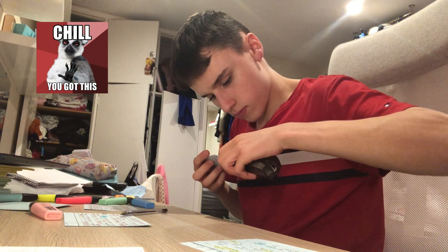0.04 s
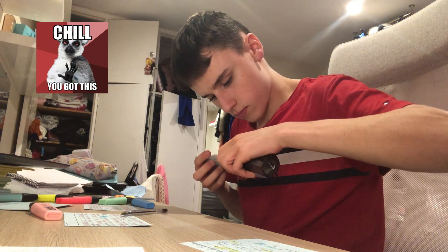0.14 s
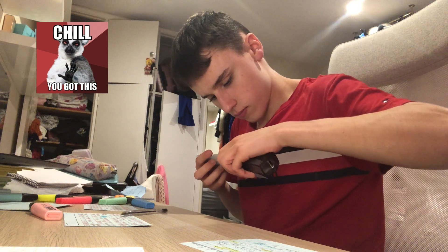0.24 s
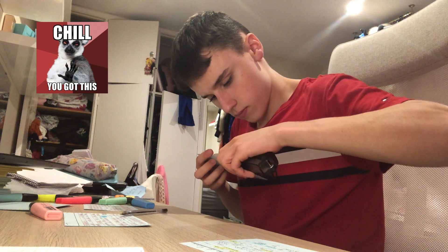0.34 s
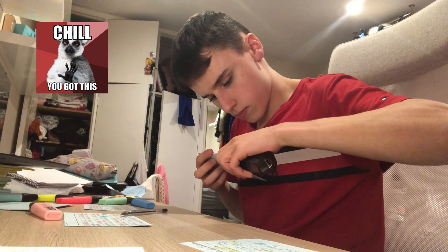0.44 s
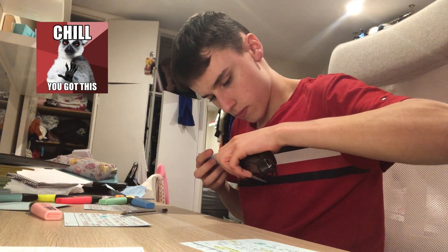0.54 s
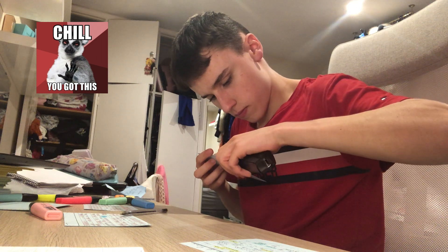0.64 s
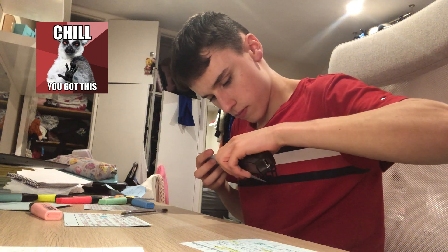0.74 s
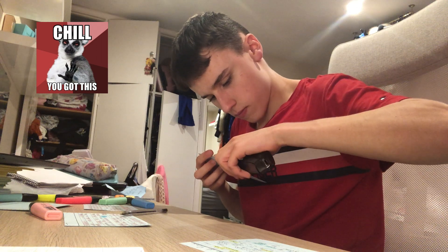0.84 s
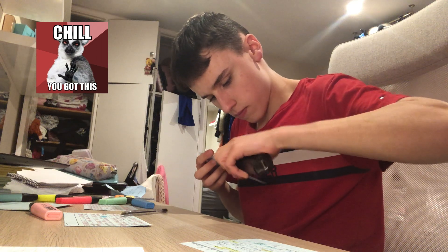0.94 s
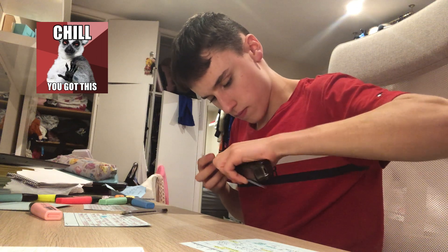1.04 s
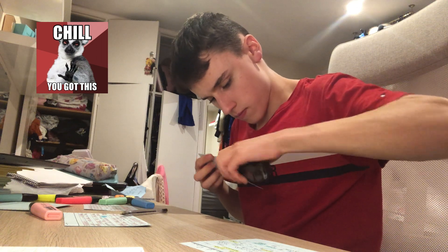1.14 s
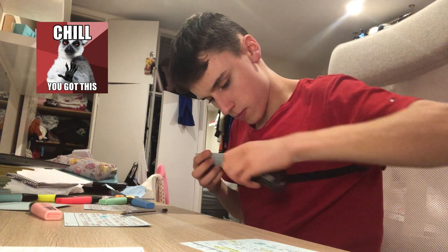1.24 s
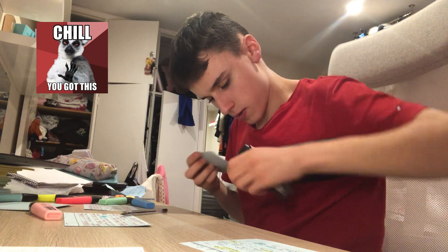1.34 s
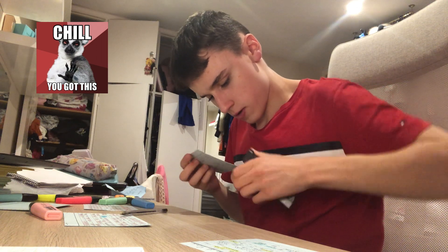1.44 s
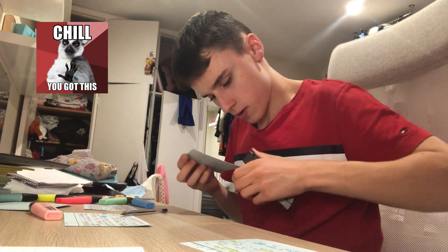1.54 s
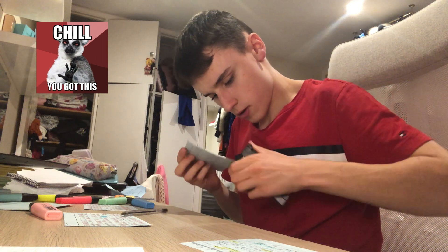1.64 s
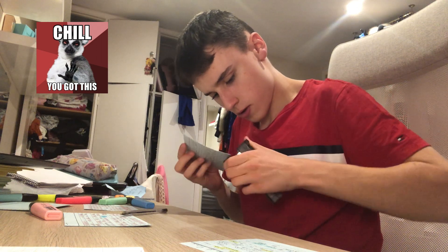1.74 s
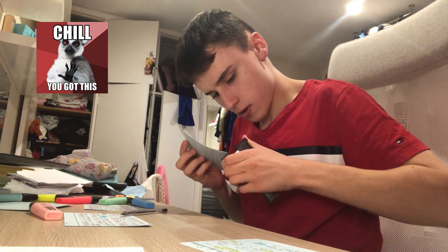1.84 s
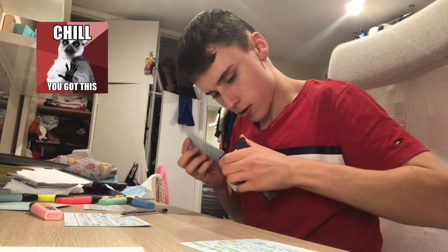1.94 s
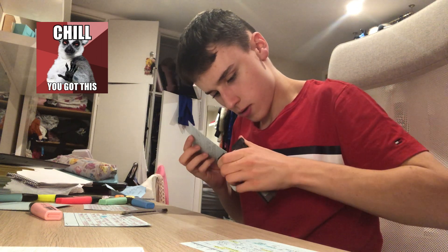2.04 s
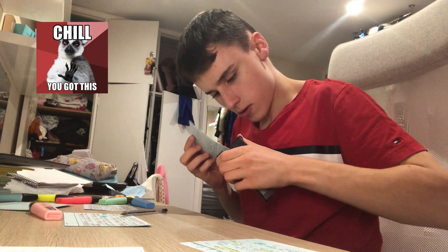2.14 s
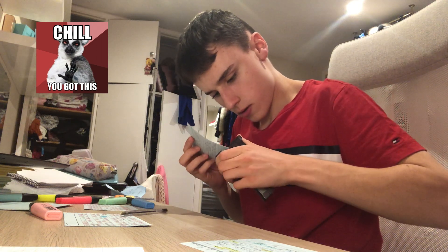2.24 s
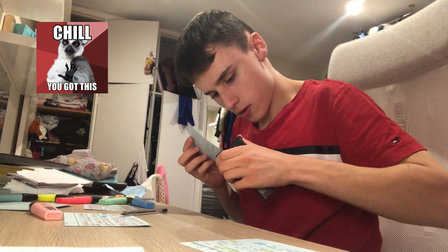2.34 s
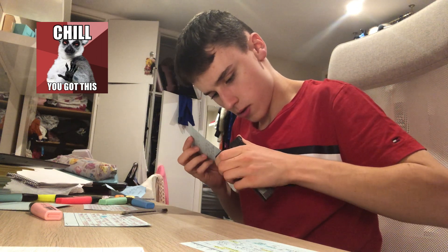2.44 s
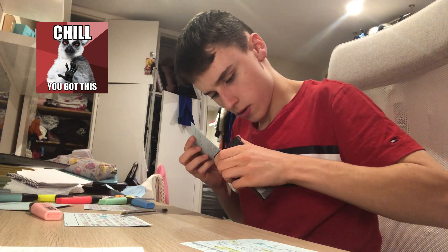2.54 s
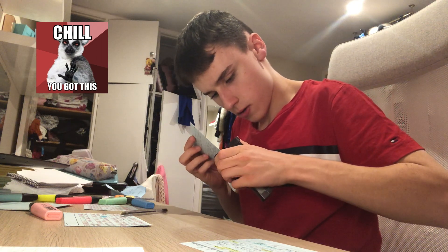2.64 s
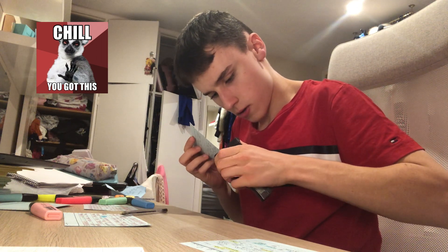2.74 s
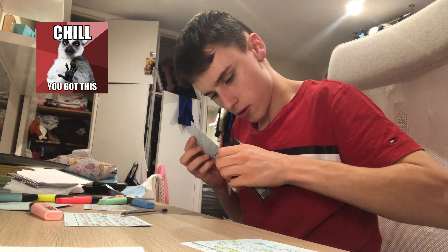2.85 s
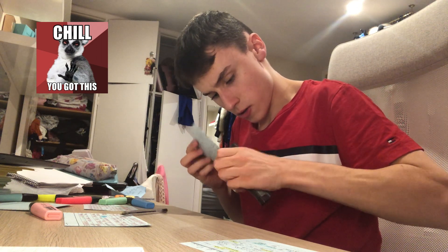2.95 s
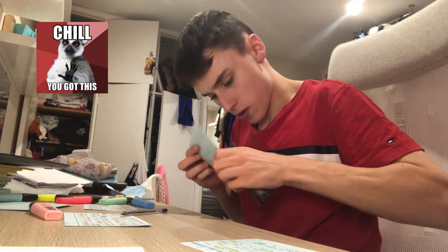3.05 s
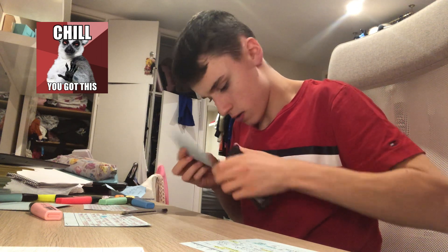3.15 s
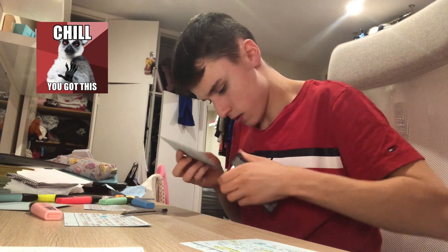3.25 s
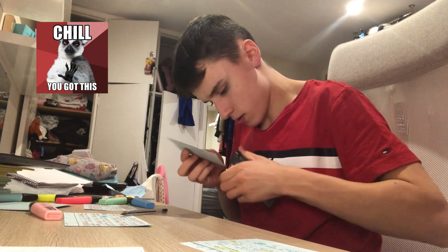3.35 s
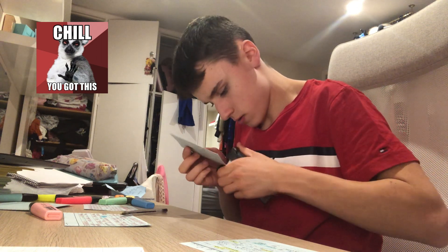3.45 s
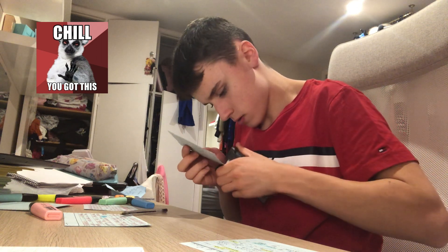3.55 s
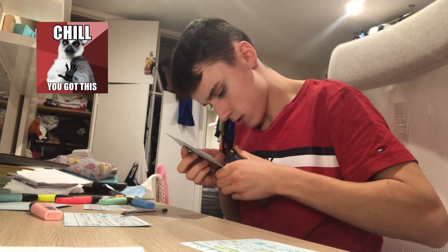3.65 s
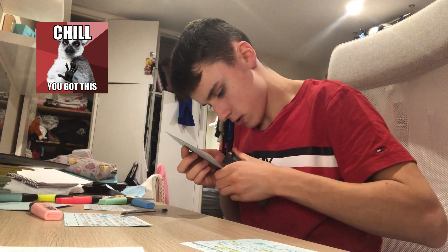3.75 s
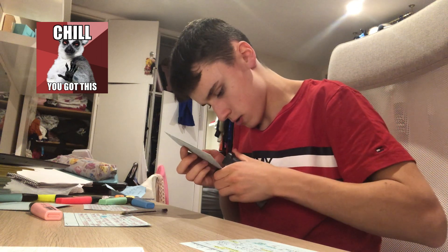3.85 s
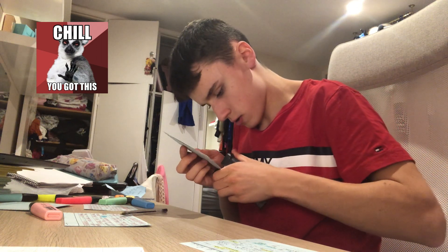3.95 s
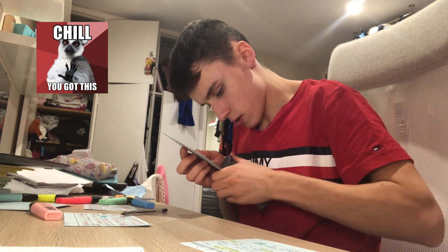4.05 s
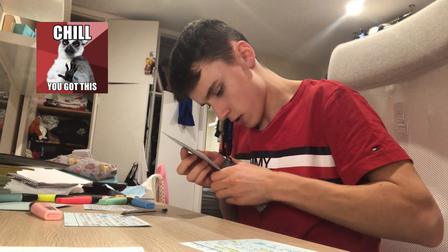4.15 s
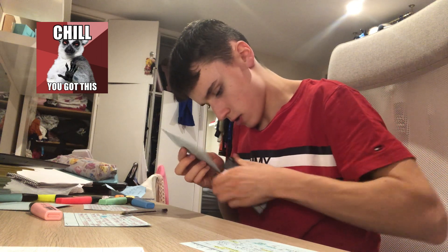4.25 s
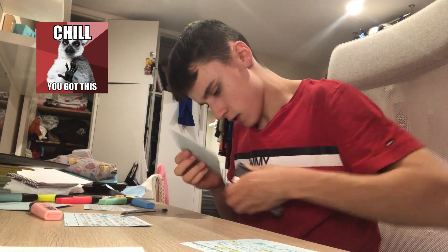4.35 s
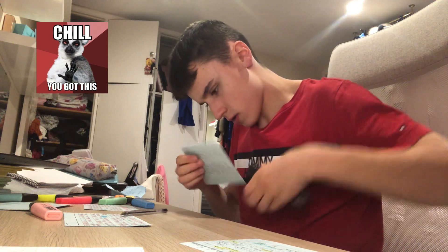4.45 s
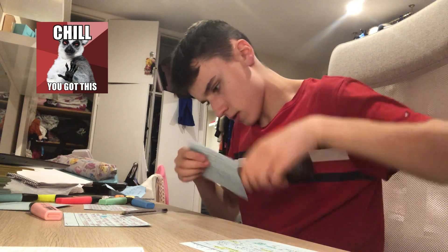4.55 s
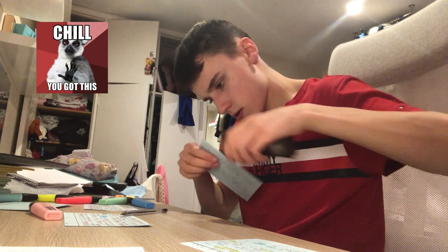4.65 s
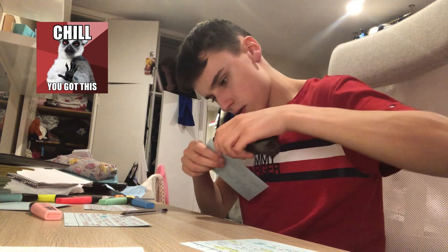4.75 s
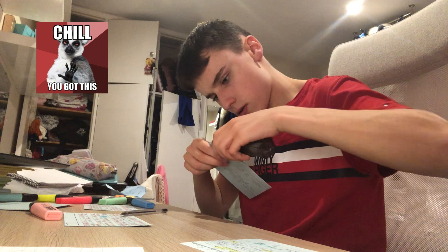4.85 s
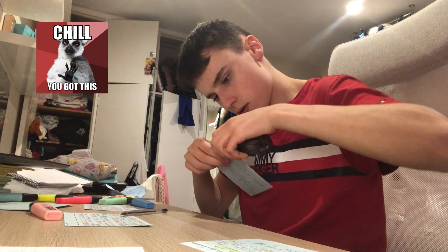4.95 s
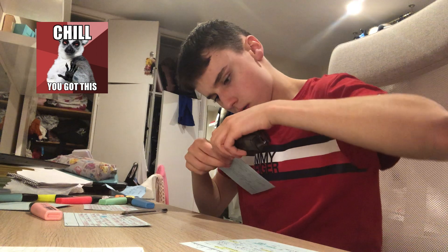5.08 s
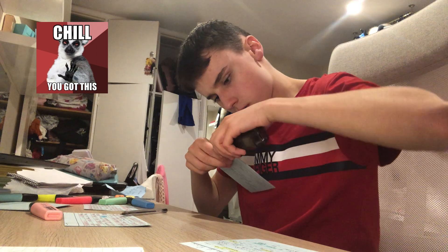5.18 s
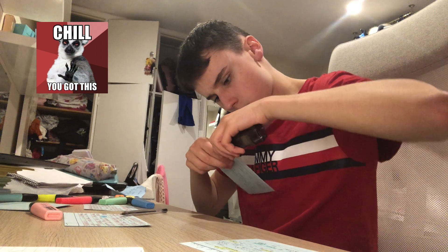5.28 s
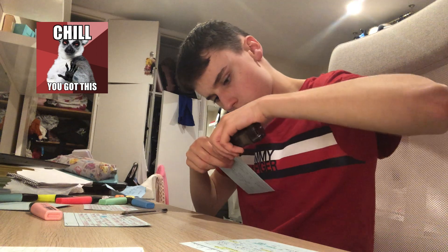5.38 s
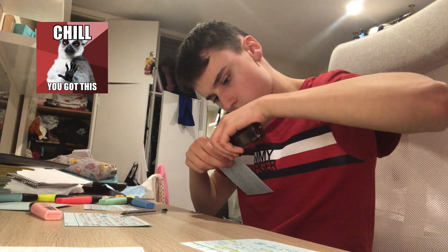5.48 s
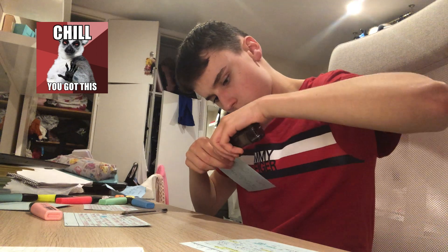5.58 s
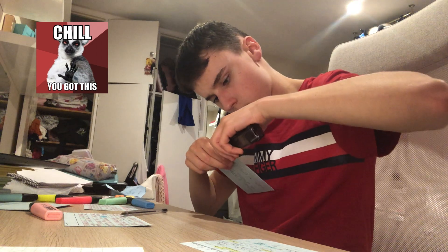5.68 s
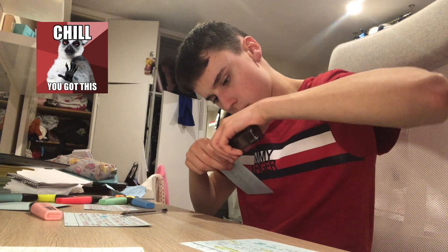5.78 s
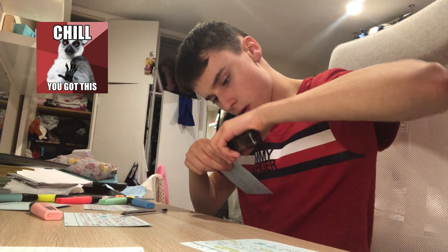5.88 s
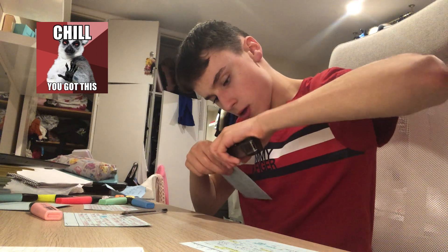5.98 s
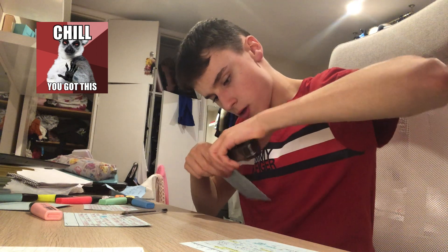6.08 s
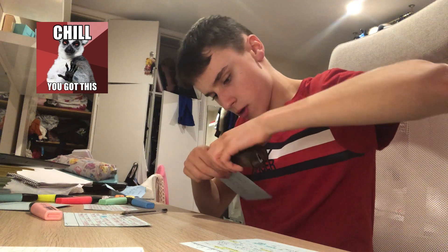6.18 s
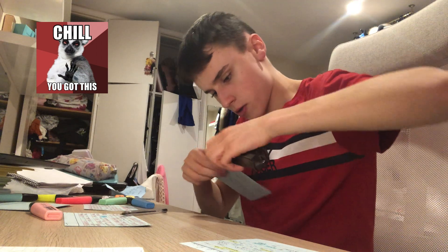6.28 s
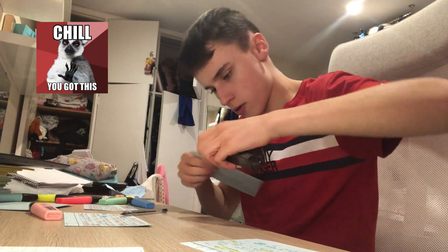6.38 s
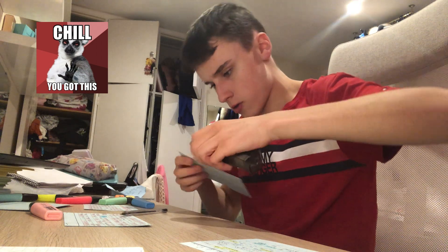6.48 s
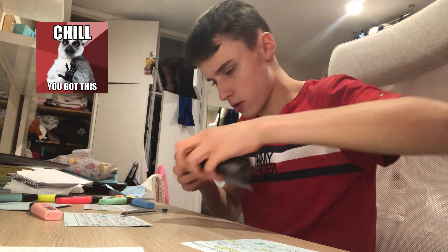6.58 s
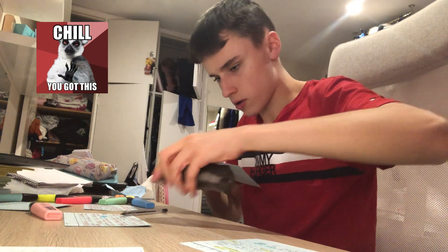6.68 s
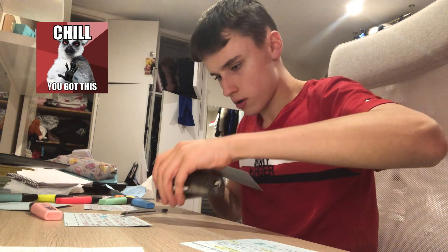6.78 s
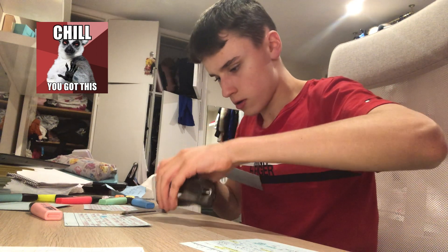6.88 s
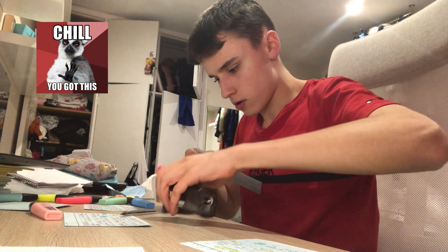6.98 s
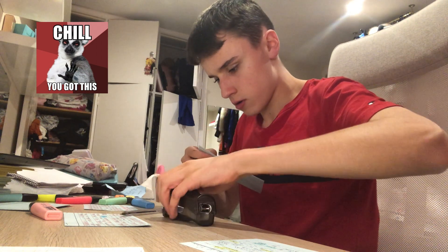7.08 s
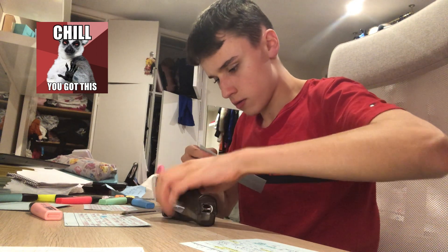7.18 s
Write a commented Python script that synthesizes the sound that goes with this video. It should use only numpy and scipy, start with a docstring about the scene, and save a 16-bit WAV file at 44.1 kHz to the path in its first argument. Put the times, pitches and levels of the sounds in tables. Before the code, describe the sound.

A hand-held stapler is squeezed four times with crisp double metallic clacks and springy releases, then dropped with a loud thump on a wooden desk.

```python
"""A small furnished room, close microphone: a hand-held stapler is squeezed four times on a sheet of paper,
then set down hard on a wooden desk. Each squeeze is a row of metal contacts: jaws close, the blade shears
and folds the staple, the arm springs back. Gritty noise and a blow ring the frame; spring tones sing on.
Creasing noise of hands and paper rustles faintly over the room's filtered-noise hum.
The desk blow sweeps down in pitch, sets the desk top's modes humming and overloads the microphone."""
import sys
import numpy as np
from scipy import signal
from scipy.io import wavfile
from scipy.ndimage import uniform_filter1d

SR = 44100
rng = np.random.default_rng(int(sys.argv[2]) if len(sys.argv) > 2 else 0)


def how_loud(loudness_db):
    """Turn decibels into a plain amplitude multiplier (0 dB gives 1, 20 dB gives 10)."""
    steps = np.asarray(loudness_db, float) / 20
    return 10 ** steps


def store_wav(level_fs):
    """Save 16-bit WAV to argv[1]."""
    pcm = np.round(np.clip(np.atleast_2d(level_fs), -1, 1) * 32767)
    wavfile.write(sys.argv[1], SR, pcm.T.astype(np.int16))


N = 318402  # length [samples]

# half-octave band edges: (frequency [Hz])
BAND_EDGES = 25 * 2 ** np.arange(0, 9.6, .5)
# noise of room and microphone: (frequency [Hz], relative level per Hz [dB])
HUM_COLOUR = [(24, -33.5), (40, -4), (171, 1.5), (312, -4.5), (697, -4), (1240, -15), (1520, -16),
              (2840, -21), (3560, -24), (7730, -22.5), (9450, -32), (14800, -21), (16000, -31)]
# rough tones in the room noise: (frequency [Hz], width [Hz], middle level [dB])
ROOM_DRONES = [(48.03, 9.3, -65.5), (174, 49, -73), (530, 43, -72.5)]
# colour of the creasing sheet: (frequency [Hz], relative level per Hz [dB])
PAPER_COLOUR = [(300, -21), (700, -19), (1500, 2.5), (2500, -3.5), (3700, 1.5), (5500, -9), (8000, -9.5),
                (12000, -18), (16000, -13.5)]
# hands on paper: (time [s], level [dB])
HANDLING_LEVEL = [(0, -70.5), (0.94, -73), (2.17, -69), (2.87, -70.5), (3.3, -62), (3.94, -68), (4.46, -59),
                  (4.7, -63), (4.85, -69.5), (5.23, -67.5), (5.43, -70), (5.9, -71.5), (6.37, -63),
                  (6.69, -59.5), (7.06, -67.5), (7.22, -61)]
# the sheet crumples in the closed jaws, one entry per squeeze: (level [dB])
GRIP_LEVEL = [-47, -51, -54.5, -60]
# modes of frame and magazine: (frequency [Hz], relative level [dB], t60 before damping [s])
FRAME_MODES = [(300, -10, .05), (480, -5, .03), (690, 0, .03), (810, -2, .025), (1150, -5, .015),
               (1320, -4, .018), (1510, 0, .03), (1850, -6, .012), (2200, -1, .022), (2700, -4, .01),
               (3150, -1, .012), (3600, 0, .014), (4200, -3, .012), (4800, -3, .012), (5300, -3, .01),
               (7800, -3, .006), (8750, -3, .006)]
# contact heard directly beside the frame's ring, in body, middle, bite and edge:
# (from [Hz], to [Hz], level against the ring before any dryness [dB])
DIRECT_CRUNCH = [(358, 1000, -3.5), (1030, 2600, -4), (2600, 5200, -1.5), (6000, 15000, 9.5)]
# light touches of jaws, arm and fingers:
# (time [s], middle 1-2.6 kHz peak [dB], body against middle [dB], bite against middle [dB])
LIGHT_TOUCHES = [(0.2758, -47.5, -2.5, 4), (0.3217, -41.5, -5, 4), (0.336, -52, -12, 5),
                 (0.3758, -54.5, -11, 6), (0.5135, -37, 1, 1.5), (0.9027, -37, -14, -2),
                 (0.9143, -27.5, -8, 2.5), (1.1308, -32.5, 4.5, 0.5), (1.156, -30, -7.5, 6),
                 (1.2235, -27.5, -5, -1), (1.235, -39, -6.5, 3), (1.3249, -44.5, -15, 12),
                 (1.3941, -65.5, -8, 14.5), (1.4554, -54, 8.5, 2.5), (2.006, -40, 5.5, -6.5),
                 (2.146, -41.5, 3.5, -16.5), (2.3334, -43, -3, -7.5), (2.348, -46, -2, -5),
                 (2.377, -46, 0, 0), (2.3835, -35, 9, 2), (2.8128, -53.5, -8, 5), (2.845, -31.5, -22, 2),
                 (2.8566, -24.5, -7, -7.5), (3.0753, -29.5, -6, 6.5), (3.1336, -35.5, 0, 8),
                 (3.408, -42.5, 2, -2.5), (3.452, -51, 10, -2), (3.5353, -38.5, -12.5, -18),
                 (3.768, -56, -5.5, 9.5), (3.845, -34, -9.5, -4.5), (4.004, -36, -21, 7.5),
                 (4.0101, -29, -6, 1.5), (4.0271, -23, -5, -6), (4.2055, -29.5, -22.5, 1),
                 (4.2272, -40, -8.5, 14.5), (4.234, -36, -8, 8.5), (4.2834, -33.5, 10.5, 0),
                 (4.3019, -36, 12, 2.5), (4.5042, -29, 0.5, 6), (4.515, -46.5, 9, -10),
                 (5.672, -46.5, -16.5, -5), (5.7102, -40, -18, 0.5), (5.7294, -42.5, -5, -3),
                 (5.7468, -29.5, -20, -25), (6.094, -32, -8, -7), (6.1, -24, -20.5, 1.5),
                 (6.212, -41, -1.5, 4), (6.2176, -41, 4.5, 0.5), (6.2293, -35.5, -0.5, 1),
                 (6.2457, -26.5, -8, -12.5), (6.8025, -41.5, -6.5, -5.5)]
# per squeeze, the three hard blows of shear, fold and spring-back:
# (time [s], middle 1-2.6 kHz peak [dB], then against it: body under 1 kHz [dB],
#  bite 2.6-6 kHz [dB], edge over 6 kHz [dB])
HARD_BLOWS = [
    [(0.9733, -1, -47, -10, -13), (1.0074, -6, -8.5, -4.5, -5), (1.1837, -11.5, -8.5, 4.5, -4)],
    [(2.8993, -9, -10, 1, -5), (2.9409, -9.5, -16, 4.5, -2.5), (3.101, -19.5, -3.5, 9, -1)],
    [(4.0525, -9.5, -7, -6.5, -14), (4.0967, -17, -3.5, 6.5, -2), (4.2555, -15, -7.5, 5, 3)],
    [(5.904, -0.5, -28, -14, -11.5), (5.9561, -8, -6, -1.5, -6.5), (6.1237, -11, -11, -1.5, 1.5)],
]
# decay of the diffuse room tail: (frequency [Hz], t60 [s])
ROOM_DECAY = [(100, 0.21), (400, 0.32), (1500, 0.13), (5000, 0.17), (15000, 0.13)]
# low modes of the room that hard blows set going: (frequency [Hz], relative level [dB], t60 [s])
ROOM_BOOM = [(124, -6.5, .2), (170, -3, .15), (216.3, -0.5, 0.11), (278.9, 11, 0.22)]
# spring tones, each stopped short; pitch drops with the jaws open:
# (start [s], end [s], frequency [Hz], starting level [dB], t60 [s])
SPRING_TONES = [(1.01, 1.13, 2150, -58, 0.45), (2.945, 3.075, 2130, -48, 0.67),
                (3.105, 3.27, 1760, -43.5, 0.3), (3.2, 3.55, 3490, -61, 1.6),
                (4.26, 4.514, 1767, -45.5, 0.47), (4.26, 4.5, 3260, -56, .6),
                (4.505, 4.676, 1870, -53.5, 0.42), (5.96, 6.1, 2150, -47.5, 1.4),
                (1.01, 1.11, 4000, -48, 0.49), (6.125, 6.21, 5040, -55, .4)]
# stapler lands on the desk and bounces:
# (time [s], hum of the top [dB], sweep [dB], sweep starts at [Hz], crack before its band-pass [dB])
DESK_LANDING = [(7.054, -31, -39, 2480, -65), (7.0765, -5, 3, 3414, -5.5), (7.092, -1, -0.5, 1338, -34),
                (7.103, -22, -7.5, 897, -16), (7.121, -20, -22, 1190, -47)]
# modes of the desk top: (frequency [Hz], relative level [dB], t60 [s])
DESK_MODES = [(130.6, 0, 0.04), (198, -19.5, 0.22), (278, -3.5, 0.17), (333.4, -23.5, 0.22),
              (410.5, -10, 0.14), (436, -15, 0.11), (498.6, -9, 0.066), (538, -1.5, 0.052),
              (662, -21.5, 0.16), (692, -24.5, 0.13), (863, -20.5, 0.091), (860, -21, 0.087),
              (885, -24, 0.1), (1010, -46, 0.25)]
# a tone near 1.1 kHz swells and rises slightly just before the main desk blow:
# (start [s], end [s], from frequency [Hz], to frequency [Hz], from level [dB], to level [dB])
PRE_BLOW_TONE = (7.058, 7.0765, 1029, 1143, -53, -13)

HUM_DB = -61.5
GRIP_RISE_S, GRIP_HOLD_S, GRIP_FADE_DB_PER_S = 0.11, 0.045, 97  # counted from the fold
EDGE_DB, EDGE_FOLLOWS = -9, 1.4  # a touch's edge at even bite, and dB of edge per dB of bite
# 1 = usual; hollow touches linger, with less damping per dB of body
BLOW_DAMPING, TOUCH_DAMPING, DAMPING_PER_DB = .82, .75, .02
# crunch raised over the frame's ring above the body; a light touch hardly rings it
BLOW_DRY_DB, TOUCH_DRY_DB = 0, 6
PALM_DAMPING = 1.3  # the palm round the frame shortens every mode
BODY_LINGERS = 1.6  # the hollow body chatters this many times longer than the treble
ROOM_DB, DESK_ROOM_DB, SYMPATHY_DB = -15, -16, -53.5
LOW_CUT_HZ, TOP_CUT_HZ = 44, 17100


def at_hz(points, hz):
    """Reads a table on a log-frequency axis."""
    table_hz, values = np.transpose(points)
    return np.interp(np.log(hz), np.log(table_hz), values)


def peak_one(x):
    """Scales to a peak of 1."""
    return x / (np.abs(x).max() + 1e-12)


def band(x, low_hz, high_hz):
    """Keeps what lies between two frequencies."""
    sos = signal.butter(2, [low_hz, high_hz], "band", fs=SR, output="sos")
    return signal.sosfilt(sos, x)


def ring(force, hz, t60):
    """A damped resonance: a unit click sets a sine of height 1 ringing."""
    r = how_loud(-60 / (t60 * SR))
    w = 2 * np.pi * hz / SR
    return signal.lfilter([0, np.sin(w)], [1, -2 * r * np.cos(w), r * r], force)


def drift(rate):
    """Slow random wander of spread 1, with a new goal rate times a second."""
    knots = rng.standard_normal(int(N / SR * rate) + 2)
    wander = np.interp(np.arange(N) / SR * rate, np.arange(len(knots)), knots)
    return wander * np.sqrt(1.5)  # straight lines between knots lose some spread


def bands(sources, gain_of_band):
    """Half-octave bands, dealt in turn to two unrelated sources, each with its own gain."""
    out = 0
    for k, (low, high) in enumerate(zip(BAND_EDGES, BAND_EDGES[1:])):
        gain = gain_of_band(np.sqrt(low * high))
        out = out + gain * band(sources[k % 2], low, high)
    return out


def add(track, s, sound):
    """Mixes a sound in from a moment on."""
    i = max(round(s * SR), 0)
    track[i:i + len(sound)] += sound[:N - i]


def hum(waver_db=2.0):
    """Steady room and microphone noise with a few rough drones, narrow resonances of noise, that waver."""
    air = bands(rng.standard_normal((2, N)), lambda hz: how_loud(at_hz(HUM_COLOUR, hz)))
    out = how_loud(HUM_DB) * air / np.std(air)
    for hz, width_hz, db in ROOM_DRONES:
        t60 = np.log(1000) / (np.pi * width_hz)
        drone = ring(rng.standard_normal(N), hz, t60)
        out += how_loud(db + waver_db * drift(2.5)) * drone / np.std(drone)
    return out


def rustle_level():
    """Handling throughout, and a swell that rises after each fold, holds and fades as the jaws let go."""
    t = np.arange(N) / SR
    level = how_loud(np.interp(t, *np.transpose(HANDLING_LEVEL)))
    for (shear, fold, back), db in zip(HARD_BLOWS, GRIP_LEVEL):
        since = t - fold[0]
        rise = np.clip(since / GRIP_RISE_S, 0, 1) ** 2
        fade_db = GRIP_FADE_DB_PER_S * np.maximum(since - GRIP_RISE_S - GRIP_HOLD_S, 0)
        level = np.hypot(level, rise * how_loud(db - fade_db))
    return level


def rustle(crisp_db=2.5, clump_db=2.2):
    """Dense tiny creases in clumps, coloured by the sheet."""
    crease_db = crisp_db * np.minimum(rng.exponential(1, N), 4) + clump_db * drift(60)
    creases = rng.standard_normal((2, N)) * how_loud(crease_db)
    sheet = bands(creases, lambda hz: how_loud(at_hz(PAPER_COLOUR, hz) + 2.0 * drift(6.9)))
    return rustle_level() * sheet / np.std(sheet)


def contacts():
    """Blows and touches, each as rows of time, four band levels, damping and dryness."""
    blows = [(*blow, BLOW_DAMPING, BLOW_DRY_DB) for squeeze in HARD_BLOWS for blow in squeeze]
    touches = []
    for s, peak_db, body_db, bite_db in LIGHT_TOUCHES:
        edge_db = EDGE_DB + EDGE_FOLLOWS * bite_db
        damping = max(TOUCH_DAMPING - DAMPING_PER_DB * body_db, .3)
        touches.append((s, peak_db, body_db, bite_db, edge_db, damping, TOUCH_DRY_DB))
    return blows, touches


def frame_ring(grit, stop, low_hz, high_hz, damping):
    """The frame's modes in and around one band, shaken by gritty noise and the blow on the stop."""
    rings = 0
    for hz, db, t60 in FRAME_MODES:
        if not low_hz - 70 < hz < high_hz + 150 * (low_hz > 2000):
            continue
        own_db, detune = rng.normal(0, [3, .03])  # the grip shifts each mode a little
        force = grit * rng.standard_normal(len(grit)) + stop
        mode = ring(force, hz * (1 + detune), t60 / (PALM_DAMPING * damping))
        rings = rings + how_loud(db + own_db) * mode
    return rings


def stapler(rows, chatter_s=0.0029, rattle_s=0.028, rattle_db=-22, stop_db=-6, thin_hz=350):
    """Metal slides with growing grit, hits its stop and chatters out; all of it rings the frame."""
    out, t = np.zeros(N), np.arange(6000) / SR
    for s, peak_db, body_db, bite_db, edge_db, damping, dry_db in rows:
        slide = np.clip(.0036 + peak_db * 4e-5, .0005, .009)  # [s]; harder strokes travel further
        grains = how_loud(4.4 * np.minimum(rng.exponential(1, len(t)), 4))
        # the blow on the stop is blunter than the grit
        stop = how_loud(stop_db - dry_db) * 10 * np.exp(-.5 * ((t - slide) / 5e-5) ** 2)
        rattle = how_loud(rattle_db - dry_db) * np.exp(-t / rattle_s)
        sound = 0
        for (low_hz, high_hz, crunch_db), part_db in zip(DIRECT_CRUNCH, [body_db, 0, bite_db, edge_db]):
            # treble peaks early in the slide, bass late
            top = slide * np.clip(1.6 - 0.1 * np.log(high_hz), .2, 2)
            linger_s = chatter_s * (BODY_LINGERS if high_hz < 2000 else 1)
            dying = np.exp(-(t - top) * damping / linger_s) + rattle
            grit = np.where(t < top, t / top, dying) * grains
            rings = frame_ring(grit, stop, low_hz, high_hz, damping)
            crunch = band(grit * rng.standard_normal(len(t)) + stop, low_hz, high_hz)
            crunch_gain = how_loud(crunch_db + dry_db * (high_hz > 2000))
            part = peak_one(peak_one(rings) + crunch_gain * peak_one(crunch))
            sound = sound + how_loud(peak_db + part_db) * part
        add(out, s - slide + .001, sound)
    # a small thing radiates no bass
    return signal.sosfilt(signal.butter(3, thin_hz, "high", fs=SR, output="sos"), out)


def room(x):
    """A diffuse tail that builds within milliseconds and dies band by band."""
    t = np.arange(16000) / SR
    noise = rng.standard_normal((2, len(t)))
    tail = bands(noise, lambda hz: how_loud(-60 * t / at_hz(ROOM_DECAY, hz)))
    tail *= np.clip((t - .003) / 0.0036, 0, 1)
    return signal.fftconvolve(x, tail / np.sqrt(np.sum(tail ** 2)))[:N]


def room_boom(blows):
    """The smoothed strength of the hard blows pushes the room's low modes, which ring on."""
    strength = np.abs(band(blows, 390, 900))
    jolt = how_loud(SYMPATHY_DB) * uniform_filter1d(strength, size=60, origin=29)
    modes = sum(how_loud(db) * ring(jolt, hz, t60) for hz, db, t60 in ROOM_BOOM)
    return band(modes, 120, 600)


def spring():
    """Thin tones that swell out of a blow and are stopped short; the high ones flutter as coils touch."""
    out = np.zeros(N)
    for start, end, hz, db, t60 in SPRING_TONES:
        t = np.arange(int((end - start) * SR)) / SR
        fade = np.clip(np.minimum(t / 0.012, (end - start - t) / .006), 0, 1)
        flutters = hz > 3000
        level_db = db - 60 * t / t60 + flutters * 4.0 * drift(60)[:len(t)]
        phase = 2 * np.pi * hz * t + flutters * 1.2 * drift(130)[:len(t)]
        add(out, start, how_loud(level_db) * fade * np.sin(phase))
    return out


def pre_blow_tone():
    """A sine near 1.1 kHz that swells and rises slightly just before the main desk blow."""
    start, end, first_hz, last_hz, first_db, last_db = PRE_BLOW_TONE
    way = np.linspace(0, 1, int((end - start) * SR))
    turns = np.cumsum(first_hz + (last_hz - first_hz) * way) / SR
    out = np.zeros(N)
    add(out, start, how_loud(first_db + (last_db - first_db) * way) * np.sin(2 * np.pi * turns))
    return out


def desk_top(force):
    """All modes of the desk top under one force; nothing radiates below the lowest."""
    return band(sum(how_loud(db) * ring(force, hz, t60) for hz, db, t60 in DESK_MODES), 85, 6080)


def desk(sweep_s=0.0049, fall_s=0.000994, end_hz=450, rattle_s=0.0095):
    """Bending waves bring the treble first, so each blow sweeps down before the top's modes hum."""
    out, t = np.zeros(N), np.arange(8000) / SR

    def burst(decay_s):
        return np.exp(-t / decay_s) * rng.standard_normal(len(t))

    for s, hum_db, sweep_db, start_hz, crack_db in DESK_LANDING:
        top_hum = how_loud(hum_db) * peak_one(desk_top(burst(rattle_s)))
        # loose things on the desk rumble along
        rumble = how_loud(hum_db - 8.5) * peak_one(band(burst(0.013), 140, 780))
        turns = np.cumsum(end_hz + (start_hz - end_hz) * np.exp(-t / fall_s)) / SR
        fade = np.clip(t * start_hz, 0, 1) * np.exp(-(t / sweep_s) ** 2)
        sweep = how_loud(sweep_db) * fade * np.sin(2 * np.pi * turns)
        crack = how_loud(crack_db) * band(burst(0.0015), 1500, 6200)
        add(out, s, top_hum + rumble + sweep + crack)
    return out + pre_blow_tone()


def scene():
    """Stapler and desk with their room, over rustle and hum."""
    blows, touches = map(stapler, contacts())
    clacks, thump = blows + touches, desk()
    wet = room(how_loud(ROOM_DB) * clacks + how_loud(DESK_ROOM_DB) * thump)
    mix = clacks + room_boom(blows) + thump + wet + spring() + rustle() + hum()
    return mix[None]  # one channel


def band_limit(x):
    """A steep low-pass at the top of the band."""
    return signal.sosfilt(signal.butter(12, 16890, fs=SR, output="sos"), x)


def record(dry):
    """The microphone loses the deepest bass, the converter clips at full scale and cuts the top."""
    low_cut = signal.butter(4, LOW_CUT_HZ, "high", fs=SR, output="sos")
    top_cut = signal.cheby2(12, 50, TOP_CUT_HZ, fs=SR, output="sos")
    clipped = np.clip(signal.sosfilt(low_cut, dry), -1, 1)
    return band_limit(signal.sosfilt(top_cut, clipped))


dry = scene()
out = record(dry)
store_wav(out)
```